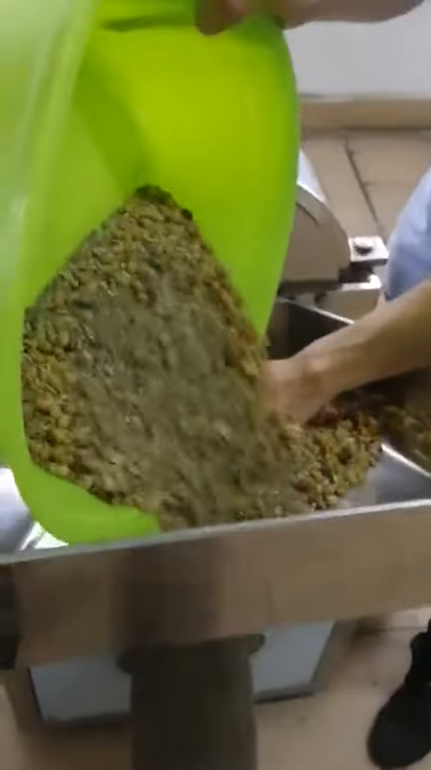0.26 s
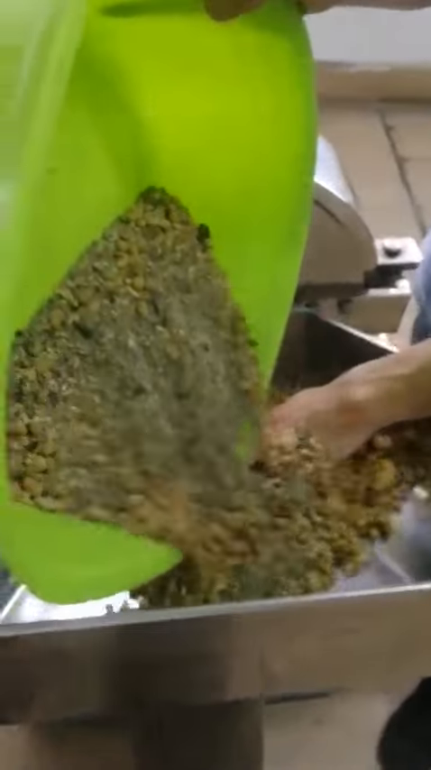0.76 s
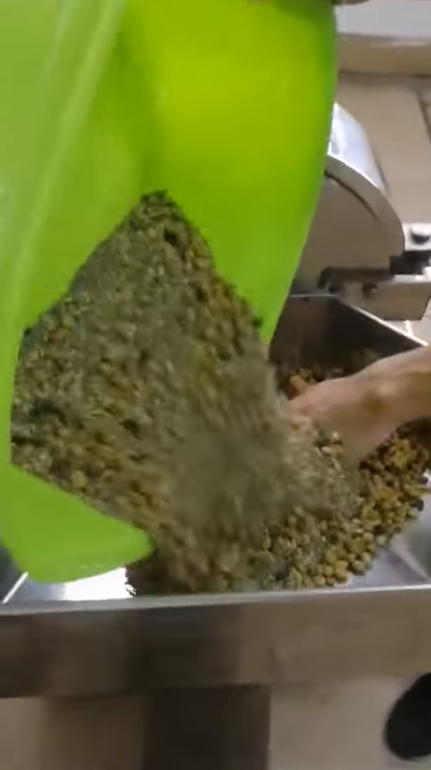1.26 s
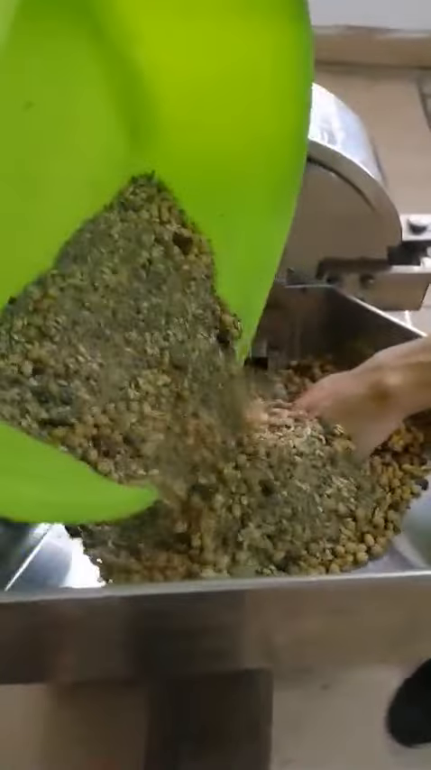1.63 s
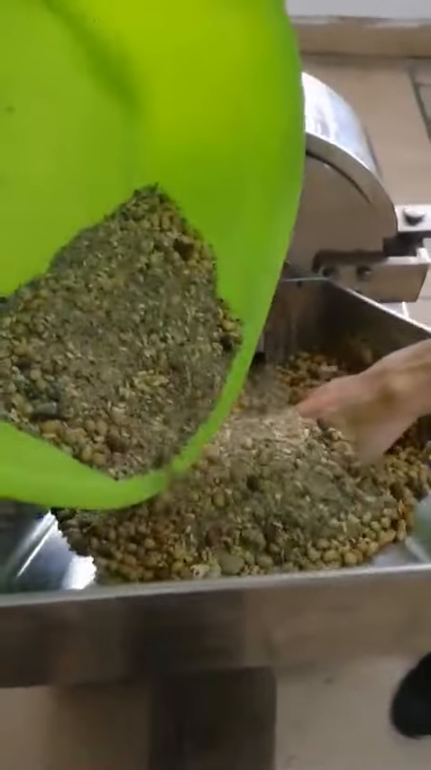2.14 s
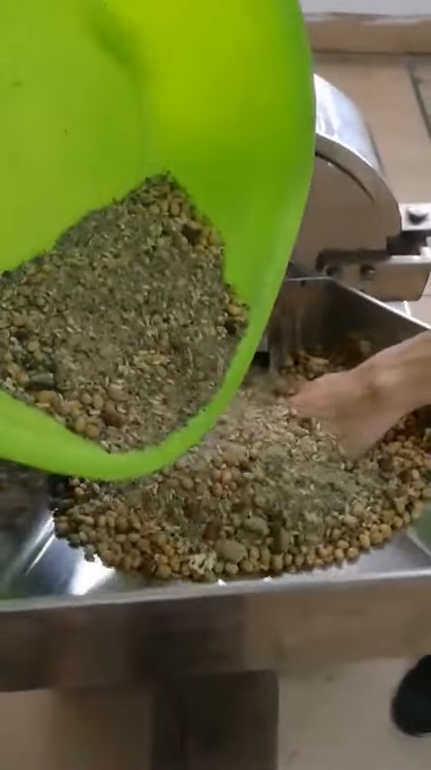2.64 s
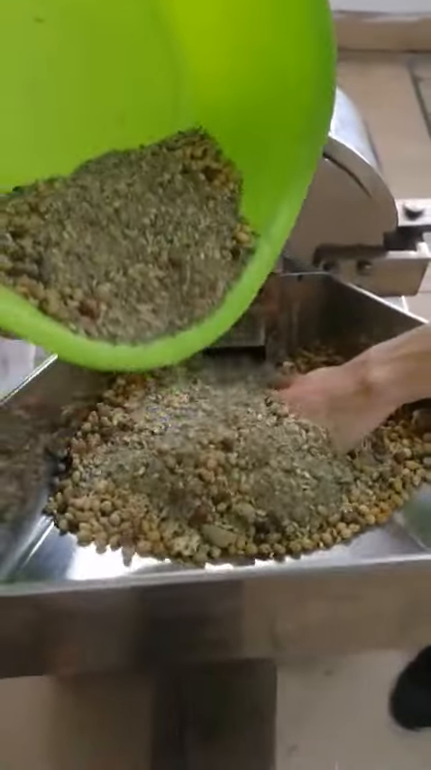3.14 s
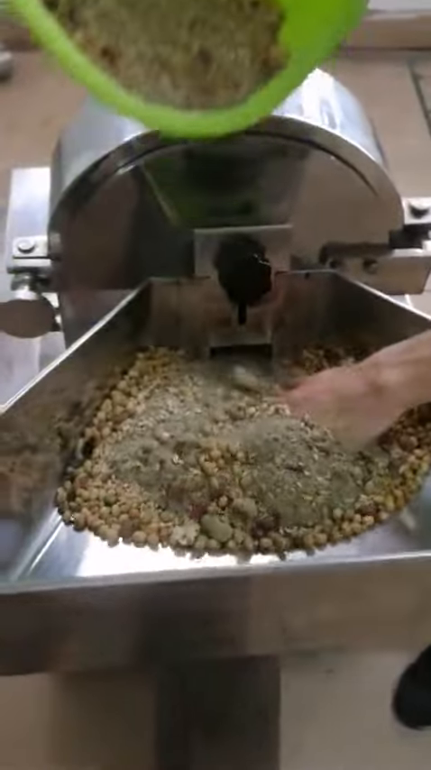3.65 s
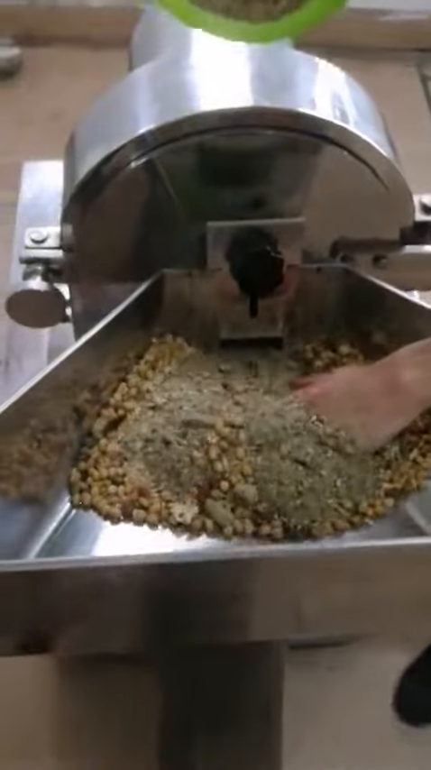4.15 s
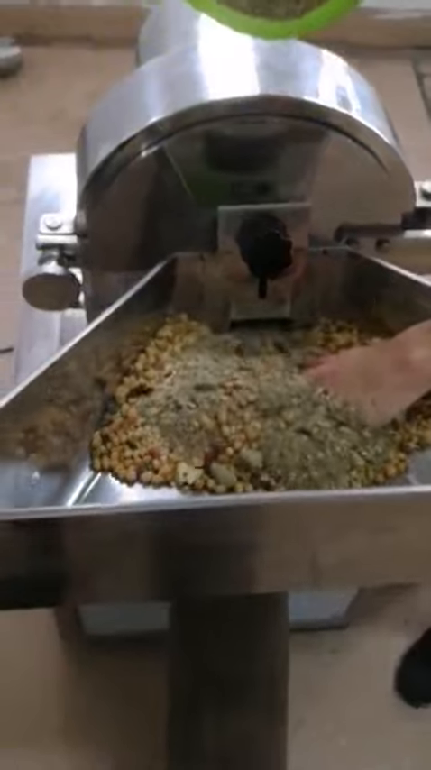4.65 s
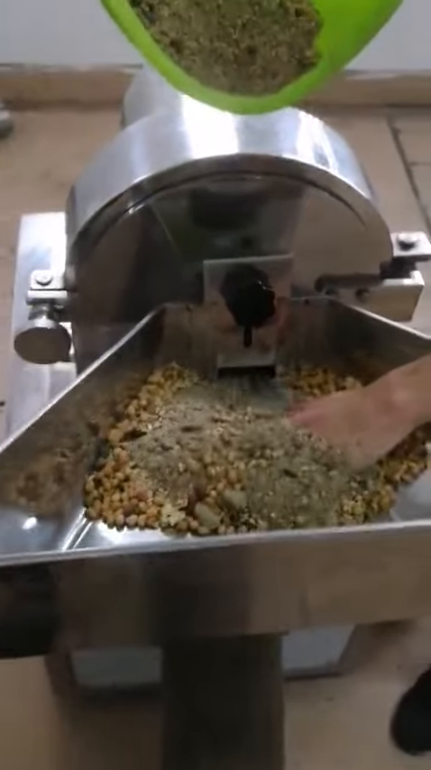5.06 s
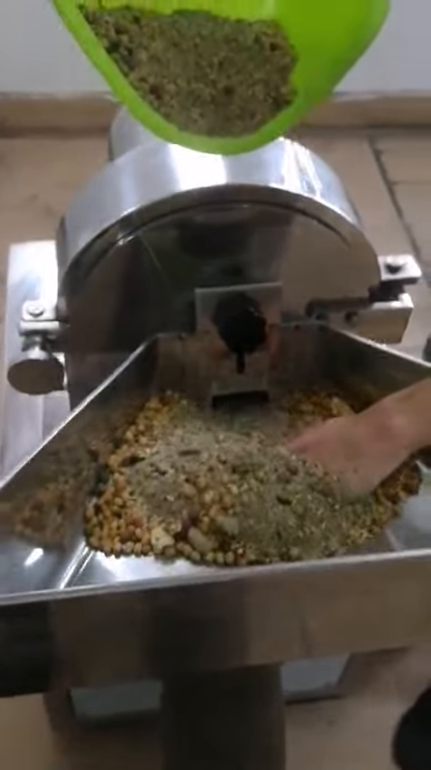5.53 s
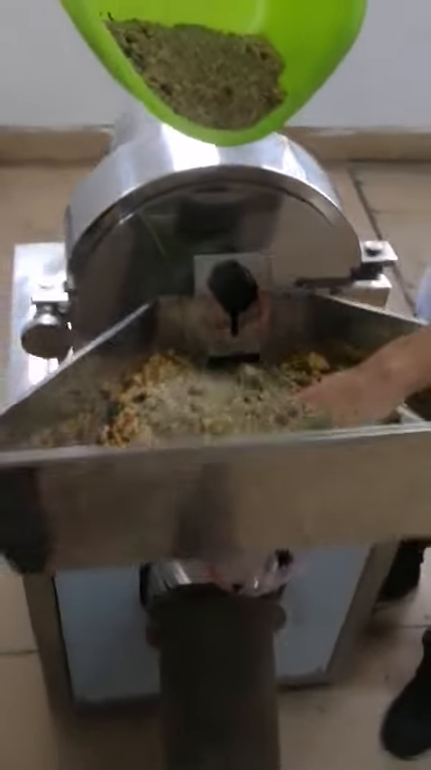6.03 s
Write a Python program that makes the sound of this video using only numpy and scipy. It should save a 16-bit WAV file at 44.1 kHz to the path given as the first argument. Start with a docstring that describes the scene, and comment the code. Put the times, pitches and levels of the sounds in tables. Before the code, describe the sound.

A small electric mill is already running: low steady hum, fluttering whine and a frame shudder throbbing about five times a second. Grain bursts in its steel chamber as a dense, bright hiss with snaps and metallic ticks. Poured grain rustles and drums dully on the hopper at first, then fades. The machine sags slightly near two seconds and grinds on. Close hand-held microphone in a hard, reflective workshop.

```python
"""A belt-driven grain mill hums, whines and shudders from the start, its tones locked to a four-armed rotor.
Kernels burst in its steel chamber as a dense, bright hiss of random ticks, with snaps and ricochets on top.
Grain pours from a bowl in a thin stream with larger slides; its drumming on the hopper soon fades under the heap.
Near two seconds the rotor sags under load and its whine flutters more; near three the bowl is raised.
Throughout, a hand-held microphone drifts through the standing waves of a hard-walled workshop."""
import sys
import numpy as np
from scipy import signal
from scipy.fft import rfft, irfft, next_fast_len
from scipy.io import wavfile
from scipy.ndimage import uniform_filter1d, map_coordinates

SR = 44100
rng = np.random.default_rng(int(sys.argv[2]) if len(sys.argv) > 2 else 0)


def transcribe(signal):
    """Save signal, clipped to [-1, 1], as a 16-bit WAV file at the path in sys.argv[1]."""
    frames = np.atleast_2d(signal).T
    limited = np.clip(frames, -1, 1)
    pcm = np.round(limited * 32767).astype(np.int16)
    wavfile.write(sys.argv[1], SR, pcm)


N = 277389  # length in samples

# In all tables pan_db is left minus right, and lead_rad is the phase by which the left port leads.
# Colours give density_db, a relative level per Hz: each coloured sound is levelled afterwards.

# balance of the two microphone ports: pitch_hz, pan_db
PORT_BALANCE = [(200, -0.5), (300, -11.5), (550, -1.5), (800, 0.5), (2000, 1.5), (6400, 1), (7500, 6),
                (9000, 10.5), (10600, -1.5), (12000, -5), (13000, -15), (15000, -7)]
# likeness of diffuse sound at the two ports: pitch_hz, correlation (-1 to 1)
PORT_LIKENESS = [(100, 0.9), (210, 1), (300, -0.032), (430, 0.16), (630, -0.59), (800, -0.45), (1100, 0.38),
                 (1450, -0.015), (1900, -0.022), (2500, -0.028), (4000, 0.083), (10000, 0.06)]
TOP_HZ = 15550  # band limit of the output

# rotor speed, which sags once the poured grain reaches the arms: start_s, speed_turns_per_s
ROTOR_SPEED = [(0, 77.27), (0.6, 77.47), (1.5, 77.26), (2.05, 76.72), (2.6, 76.78), (3.4, 76.95),
               (4.8, 76.86), (5.3, 76.96), (6.29, 77.03)]
ARMS = 4
# hum of the passing arms: start_s, level_db (before HUM_GAIN_DB), pan_db
HUM_LEVELS = [(0.05, -24.5, 2.5), (1.44, -21.5, 2), (1.83, -19, 1.5), (2.53, -19.5, 1.5),
              (4.13, -18.5, 1.5), (5.05, -22.5, 2), (5.39, -20, 2), (6.06, -24.5, 5), (6.2, -26, 17)]
HUM_GAIN_DB, HUM_LEAD_RAD = 1.5, -0.94

# overtones of the arms, pushed from port to port by the room's standing waves as the microphone moves:
# start_s, left_db, right_db (both before WHINE_GAIN_DB)
THIRD_OVERTONE = [(0.0, -40, -62), (0.37, -28, -34), (1.65, -26.5, -35), (2.0, -33, -35.5),
                  (2.47, -39, -33), (2.92, -32, -35), (3.07, -41.5, -36), (3.52, -26.5, -34),
                  (4.94, -27.5, -39), (6.29, -29, -42)]
FOURTH_OVERTONE = [(0.0, -42.5, -31.5), (0.52, -33.0, -34), (0.97, -40, -35), (1.27, -35.5, -38),
                   (2.39, -33.5, -31.5), (3.52, -31, -34), (5.24, -34.5, -28), (6.06, -29, -37),
                   (6.29, -36, -41)]
FIFTH_OVERTONE = [(0.0, -22.5, -29), (0.4, -26, -26.5), (1.4, -31, -34), (1.78, -30, -38), (1.9, -48, -32),
                  (2.25, -46, -35), (2.45, -49, -25), (2.84, -29, -41), (2.99, -40, -31.5),
                  (3.37, -33, -37), (3.59, -30.5, -38), (4.12, -26.5, -45), (4.27, -41, -28),
                  (5.46, -28, -36), (6.29, -26, -49)]
SIXTH_OVERTONE = [(0.0, -52, -27.5), (0.45, -30, -36), (0.97, -26, -52), (1.45, -29, -49),
                  (1.82, -40, -28.5), (1.95, -40, -40), (2.45, -33.5, -35), (2.95, -37, -37),
                  (3.14, -54.0, -31.5), (3.9, -54, -30), (4.19, -54, -34), (5.24, -53, -35),
                  (5.62, -46, -31), (5.84, -40, -51), (6.29, -44, -45)]
SEVENTH_OVERTONE = [(0.0, -44, -45), (0.8, -46, -60), (1.42, -40, -56), (1.8, -37.5, -42),
                    (2.6, -41.5, -43), (3.14, -38, -50), (3.4, -44, -47), (3.75, -42, -40),
                    (4.0, -35.5, -44), (4.56, -37, -52), (5.65, -43, -40), (6.29, -43, -43)]
WHINE_GAIN_DB = 0.4
# phase between the ports as the microphone crosses a node: start_s, sixth_lead_rad, seventh_lead_rad
NODE_PHASES = [(0, -1.3, 1.5), (1.5, -1.7, 1.7), (2.3, -0.9, 2.9), (2.7, -3, 2), (2.95, -3.5, 2.4),
               (3.2, -1.8, 1.3), (6.29, -2, 2.1)]

# weaker tones of the shaft: multiple_of_speed, level_db (at mid-scene),
# drift_db_per_s (as the microphone moves), pan_db, lead_rad
SHAFT_TONES = [(1, -37.5, -0.5, -0.5, 0.2), (5, -39, -1, -27, 1), (6, -35, 0.5, 9, 1.17),
               (8, -35.5, -1, 2, -2.5), (32, -44.5, -0.1, 2, 4)]
# shaking of the frame at twice the rotor speed: start_s, rotor_level_db, motor_share (of the rotor's part)
FRAME_SHUDDER = [(0.05, -28, 0.33), (.21, -26, .2), (.38, -28, 0.8), (.6, -30, 0.73), (.88, -23, 0.7),
                 (1.08, -32.5, .9), (1.3, -25, 0.72), (1.6, -29.5, 0.66), (1.85, -24.5, 0.39),
                 (2.1, -26, 0.45), (2.27, -22.5, .25), (2.48, -24.5, .5), (2.68, -22.3, 0.31),
                 (3.0, -22.3, .6), (3.31, -23.5, 0.67), (3.73, -24.5, 0.43), (4.15, -24.5, 0.16),
                 (4.45, -24.5, 0.29), (4.69, -24, 0.66), (5.13, -22.5, 0.34), (5.37, -24, 0.74),
                 (5.7, -23, .5), (5.85, -27, 0.45), (6.0, -25.5, .15), (6.29, -25, .25)]
# the motor falls behind the rotor as the belt slips: start_s, beats_count (each whole number is a lull)
BELT_BEATS = [(.05, 0), (.385, 2), (.59, 3), (.78, 4), (1.2, 6), (1.44, 7), (1.9, 9), (2.09, 10), (2.5, 12),
              (3.08, 15), (3.53, 17), (4.1, 20), (4.69, 23), (4.93, 24), (5.14, 25), (5.39, 26), (5.58, 27),
              (5.81, 28), (6.29, 31)]
# drone at three times the rotor speed: start_s, level_db (before its pulsing)
DRONE_LEVELS = [(0, -33), (.3, -29.5), (1.1, -33), (2.4, -31), (3.1, -34), (4.7, -37), (5.7, -38),
                (6.2, -35)]
# tones of motor, belt and bearings: pitch_hz (at the mean rotor speed), level_db
DRIVE_TONES = [(53.7, -42), (104.7, -44), (107.2, -45), (119.5, -44), (134.4, -45), (136.7, -37),
               (164.4, -43.5), (166.5, -40), (179, -43), (253.5, -44.5), (286, -43.5), (291, -42),
               (429, -50), (476, -43.5), (597, -49.5), (1375, -42.5)]

# colour of the air churned by the rotor: pitch_hz, density_db
AIR_RUSH = [(20, -26), (45, -17), (100, -8), (150, -3), (195, -8), (290, 2), (380, -4), (480, -2),
            (700, -6), (1000, -10), (1500, -7), (2000, -18.5), (2850, -27), (4000, -39.5), (6000, -19.5),
            (9000, -29.5)]
AIR_DB = -25

# how hard the grain is being ground: start_s, level_db
GRIND_LEVELS = [(0, -24), (.2, -25), (.37, -28), (.47, -27), (.65, -24), (.72, -27.5), (.88, -25.5),
                (.97, -28.5), (1.17, -21.5), (1.3, -23.3), (1.5, -23), (1.65, -20), (1.9, -22),
                (2.1, -21.5), (2.48, -20.7), (2.6, -24), (2.95, -22.5), (3.27, -22), (3.45, -22),
                (3.7, -23.5), (4.05, -21.5), (4.44, -21), (4.58, -22), (4.78, -19.5), (5.0, -19.5),
                (5.25, -23), (5.45, -22), (5.8, -22.3), (6.29, -23.5)]
# colour of shattering grain: pitch_hz, density_db
GRIT_COLOUR = [(1500, -20), (3000, -14), (3900, -19.5), (4500, -12), (5400, -12.5), (6100, -14),
               (7200, -5.5), (7600, -7.5), (8200, -4), (9200, -3.6), (10500, -13.5), (11100, -15),
               (11550, -17), (12400, -12), (13100, -18.5), (14200, -15), (15000, -22.5)]
# ringing modes of the steel chamber, relative to the grit, before their power is doubled:
# pitch_hz, width_hz, early_pour_db, late_pour_db, bowl_raised_db
STEEL_MODES = [(2710, 43, 6, 3, 4.5), (3670, 39, 6, 8, 3), (5240, 140, -14, -2, -1), (6480, 104, 0, 4, 3.5),
               (7000, 70, 1, -11, -8), (7440, 75, -4, -1, 0.5), (7930, 220, 2.5, -6.5, 2.5),
               (8670, 120, 4, -23, -2), (8830, 38, -5, -0.5, -1), (9380, 91, 0, -16, -4.5),
               (11200, 130, -8, -15, 3), (12000, 130, 5, 5, -12), (12300, 220, 3, -3, -3),
               (13520, 120, 3, 0, 6), (14020, 80, -8, 0, -3)]
# when each of those three colours is fully reached: start_s
STAGE_TIMES = [0.45, 2.32, 4.5]

# colour of coarse grain crushed between the arms and the casing: pitch_hz, density_db
CRUNCH_COLOUR = [(1200, -15), (2000, 0), (2900, 1), (3900, -3.5), (5000, -2.5), (6500, -7), (9000, -17)]
CRUNCH_DB, CRUNCH_FOLLOWS_FEED = -35, 0.19  # level at the average feed; dB per dB of feed

# whole kernels that ricochet off the steel; the level is relative to the feed
RICOCHETS_PER_S, RICOCHET_DB, RICOCHET_SPREAD_DB = 130, -12, 3.5
RICOCHET_HZ, RICOCHET_SPREAD_OCTAVES, RICOCHET_T60_S = 7700, 0.2, 0.016

# colour of falling grain drumming on the steel hopper: pitch_hz, density_db
HOPPER_COLOUR = [(250, -40), (400, -2), (560, 6), (720, 0), (1100, -9), (2300, -19.5), (4000, -40)]
HOPPER_DB, HOPPER_COVERED_S, HOPPER_FADE_DB_PER_S = -32, 0.86, 7

# colour of dry grain sliding onto the heap: pitch_hz, density_db
RUSTLE_COLOUR = [(2000, -6), (5000, -53), (8000, -5), (10000, 4), (12000, 2), (14000, 3), (15500, -19)]
# thin stream between the slides, until the bowl is raised
STREAM_DB, STREAM_END_S, STREAM_FADE_DB_PER_S = -41, 2.85, 75
# clumps that slide out of the bowl: peak_s, level_db
BOWL_SLIDES = [(.25, -28.5), (.52, -37), (1.08, -36), (1.38, -30)]
SLIDE_RISE_DB_PER_S, SLIDE_FALL_DB_PER_S = 83, 82

# hard kernels that crack: start_s, level_db (before CRACK_GAIN_DB)
HARD_KERNELS = [(.195, -9.5), (.249, -10.5), (.432, -14), (0.446, -8), (.521, -11.5), (.576, -9.5),
                (.631, -14.5), (.649, -15), (.84, -11), (.868, -13), (1.047, -6), (1.174, -10),
                (1.191, -6.5), (1.22, -7.5), (1.612, -6.5), (1.806, -6), (1.986, -11), (2.076, -6),
                (2.098, -6.5), (3.772, -10), (3.884, -6), (4.122, -6), (4.189, -13), (4.236, -6),
                (4.346, -9), (4.667, -11), (4.793, -8.5), (4.849, -9), (5.007, -17), (5.271, -24),
                (5.295, -11.5), (5.413, -12), (5.544, -13), (5.629, -19), (5.762, -7.5), (6.041, -6.5),
                (6.142, -14), (6.225, -9)]
CRACK_GAIN_DB = -9.0


def amp(db):
    """Decibels to gain."""
    return 10 ** (np.asarray(db) / 20)


def unit(x):
    """Bring x to rms 1."""
    return x / np.sqrt(np.mean(x ** 2) + 1e-20)


def along(points, hz):
    """Join (Hz, value) points on a log frequency axis."""
    f, v = np.transpose(points)
    return np.interp(np.log(hz + 1), np.log(f + 1), v)


def curves(rows):
    """Draw one automation curve, a value per sample, for each column after the time."""
    s, *columns = np.transpose(rows)
    return [np.interp(np.arange(N) / SR, s, column) for column in columns]


def wobble(rate):
    """A smooth random curve with rate knots a second."""
    steps = np.arange(0, N, 64)  # a coarse grid is smooth enough
    knots = rng.standard_normal(int(N * rate / SR) + 4)
    return np.interp(np.arange(N), steps, map_coordinates(knots, [steps * rate / SR]))


def filtered(x, response):
    """Filter x by a gain that depends on frequency."""
    m = next_fast_len(N + SR // 2)
    spectrum = rfft(x, m)
    return irfft(spectrum * response(np.fft.rfftfreq(m, 1 / SR)), m)[..., :N]


def sides(pan_db):
    """Left and right gains that keep the power."""
    gains = amp(np.array([[.5], [-.5]]) * pan_db)
    return gains / np.sqrt(np.mean(gains ** 2, axis=0))


def diffuse(pair, colour):
    """Two unrelated signals become one coloured, diffuse stereo sound of rms 1."""
    def mid_side_gains(hz):
        turn = np.arccos(np.clip(along(PORT_LIKENESS, hz), -1, 1)) / 2
        return colour(hz) * np.array([np.cos(turn), np.sin(turn)])

    mid, side = filtered(pair, mid_side_gains)
    left_right = np.array([mid + side, mid - side])
    return unit(filtered(left_right, lambda hz: sides(along(PORT_BALANCE, hz))))


def tone(angle, pan_db, lead, flutter, flutter_rate):
    """A stereo tone, rms 1 before panning, whose strength and phase flutter with the turbulence."""
    unsteady = 1 + flutter * (wobble(flutter_rate) + 1j * wobble(flutter_rate))
    note = unsteady * np.exp(1j * (angle + rng.uniform(0, 2 * np.pi)))
    port_phase = np.exp(1j * np.array([[.5], [-.5]]) * lead)
    return sides(pan_db) * unit(np.real(note * port_phase))


def spray(blows, t60):
    """The power of each blow dies away by 60 dB in t60 seconds as its fragments scatter."""
    t = np.arange(SR // 4) / SR
    return signal.fftconvolve(blows, amp(-60 * t / t60) ** 2)[:N]


def patter(blows_per_s, size_db, t60):
    """Power, of mean 1, of blows at random times and in random sizes."""
    sizes = amp(size_db * np.clip(rng.standard_normal(N), -2, 2)) ** 2
    blows = (rng.random(N) < blows_per_s / SR) * sizes
    bursts = spray(blows, t60)
    return bursts / np.mean(bursts)


def shatter(power, colour, fragments_per_s):
    """Tiny fragments tick so densely that they merge into a sizzle of the given power."""
    hits = rng.random((2, N)) < fragments_per_s / SR
    ticks = hits * rng.standard_normal((2, N))
    return diffuse(ticks * np.sqrt(np.abs(power)), colour) * np.sqrt(np.mean(np.abs(power)))


def patchy(x, depth_db, width_hz, life_s):
    """Patches of the spectrum swell and fade on their own; the result has rms 1."""
    hz, s, z = signal.stft(x, SR, nperseg=1024)
    field = rng.standard_normal(z.shape[1:])
    field = uniform_filter1d(field, size=max(1, round(width_hz / hz[1])), axis=0)
    field = uniform_filter1d(field, size=max(1, round(life_s / s[1])), axis=1)
    _, patched = signal.istft(z * amp(depth_db * unit(field)), nperseg=1024)
    return unit(patched[:, :N])


def hum(angle):
    """The arms pass four times a turn and make a strong, low note."""
    level_db, pan_db = curves(HUM_LEVELS)
    note = tone(ARMS * angle, pan_db, HUM_LEAD_RAD, flutter=0.04, flutter_rate=33)
    return amp(level_db + HUM_GAIN_DB) * note


def overtone(angle, levels, order, lead):
    """A multiple of the arm rate with a level for each port; it flutters more once grain loads the rotor."""
    flutter = np.interp(np.arange(N) / SR, [1.5, 2.0], [0.09, 0.27])
    note = tone(order * ARMS * angle, 0, lead + 0.2 * wobble(2.22), flutter=flutter, flutter_rate=20)
    return amp(WHINE_GAIN_DB + np.array(curves(levels)) + 0.64 * wobble(9.6)) * note


def whine(angle):
    """Five overtones of the arms make the whine."""
    sixth_lead, seventh_lead = curves(NODE_PHASES)
    return (overtone(angle, THIRD_OVERTONE, order=3, lead=-1.36)
            + overtone(angle, FOURTH_OVERTONE, order=4, lead=0)
            + overtone(angle, FIFTH_OVERTONE, order=5, lead=-0.21)
            + overtone(angle, SIXTH_OVERTONE, order=6, lead=sixth_lead)
            + overtone(angle, SEVENTH_OVERTONE, order=7, lead=seventh_lead))


def rotor(angle):
    """The weaker tones turn at whole multiples of the shaft speed."""
    from_middle_s = (np.arange(N) - N / 2) / SR
    total = 0
    for order, level_db, drift_db, pan_db, lead in SHAFT_TONES:
        note = tone(round(order) * angle, pan_db, lead, flutter=0.1, flutter_rate=12)
        total = total + amp(level_db + drift_db * from_middle_s) * note
    return total


def shudder(angle):
    """Rotor and motor shake the frame in and out of step, so it throbs about five times a second."""
    rotor_db, motor_share = curves(FRAME_SHUDDER)
    beats, = curves(BELT_BEATS)
    throb = 1 - motor_share * np.exp(-2j * np.pi * beats)  # rotor minus the lagging motor
    note = tone(2 * angle + np.angle(throb), 0, 0.33, flutter=0.051, flutter_rate=5.6)
    return amp(rotor_db) * np.abs(throb) * note


def drone(angle):
    """A tone at three times the rotor speed swells a little in each lull of the shudder."""
    level_db, = curves(DRONE_LEVELS)
    beats, = curves(BELT_BEATS)
    note = tone(3 * angle, -1, -1.5, flutter=0.1, flutter_rate=12)
    return amp(level_db + 1.5 * np.cos(2 * np.pi * beats)) * note


def drive(angle, speed):
    """Faint tones of motor, belt and bearings follow the rotor's changes of speed."""
    clock = angle / np.mean(speed)
    return sum(amp(level_db) * tone(hz * clock, 0, 0.075, flutter=0.49, flutter_rate=2.86)
               for hz, level_db in DRIVE_TONES)


def air(angle, chop):
    """Air rushes through the chamber, its upper part chopped by each passing arm."""
    rush = diffuse(rng.standard_normal((2, N)), lambda hz: amp(along(AIR_RUSH, hz)))
    upper = filtered(rush, lambda hz: hz ** 4 / (hz ** 4 + 700 ** 4))  # high-pass at 700 Hz
    chopped = rush + chop * np.cos(ARMS * angle) * upper
    return amp(AIR_DB + 1.2 * wobble(8.6)) * unit(chopped)


def chamber(hz, stage, ripple_db=4.3, spacing=40):
    """Breaking grain excites the steel's strong modes and a random ripple of countless weak ones."""
    ring = sum(amp(db[stage]) ** 2 / (1 + (2 * (hz - centre) / width) ** 2)
               for centre, width, *db in STEEL_MODES)
    ripple = map_coordinates(rng.standard_normal(size=2048), [hz / spacing], order=1)
    return amp(along(GRIT_COLOUR, hz) + ripple_db * ripple) * np.sqrt(1 + 2 * ring)


def in_chamber(power, fragments_per_s):
    """The ring of the chamber shifts colour as the bowl and the heap cover and uncover the inlet."""
    t = np.arange(N) / SR
    total = 0
    for stage, peak in enumerate(np.eye(len(STAGE_TIMES))):
        share = np.interp(t, STAGE_TIMES, peak)  # crossfade between stages
        total = total + shatter(power * share, lambda hz: chamber(hz, stage), fragments_per_s)
    return total


def grinding(dust_share):
    """Kernels burst at random over a sandy stream of meal and strike parts of the steel, whose ring drifts."""
    feed_db, = curves(GRIND_LEVELS)
    dust = np.clip(dust_share, 0, 1)
    bursts = dust + (1 - dust) * patter(blows_per_s=190, size_db=2.5, t60=0.14)
    power = amp(feed_db + 0.68 * wobble(9.4)) ** 2 * bursts + cracks()
    fragments = in_chamber(power, fragments_per_s=20000)
    sizzle = patchy(fragments, depth_db=1.5, width_hz=790, life_s=0.025)
    drifting = patchy(sizzle, depth_db=1.4, width_hz=50, life_s=0.4)
    return np.sqrt(np.mean(power)) * drifting


def crunch():
    """Coarse pieces crush in quick, gritty snaps below the sizzle, in a restless colour."""
    feed_db, = curves(GRIND_LEVELS)
    snaps = patter(blows_per_s=300, size_db=3, t60=0.07)
    grit = shatter(snaps, lambda hz: amp(along(CRUNCH_COLOUR, hz)), fragments_per_s=12000)
    uneven = patchy(grit, depth_db=4, width_hz=350, life_s=0.035)
    return amp(CRUNCH_DB + CRUNCH_FOLLOWS_FEED * (feed_db - feed_db.mean())) * uneven


def ricochets(count=4):
    """Whole kernels bounce off the steel; each tick rings a few short modes of its own."""
    feed_db, = curves(GRIND_LEVELS)
    t = np.arange(round(RICOCHET_T60_S * SR)) / SR
    starts = np.flatnonzero(rng.random(N) < RICOCHETS_PER_S / SR)
    ticks = np.zeros((2, N + len(t)))
    for start in starts:
        hz = RICOCHET_HZ * 2 ** (RICOCHET_SPREAD_OCTAVES * rng.standard_normal((count, 1)))
        size = amp(RICOCHET_SPREAD_DB * np.clip(rng.standard_normal(), -2, 2))
        modes = np.sin(2 * np.pi * hz * t) * amp(-60 * t / RICOCHET_T60_S)
        mode_gains = rng.uniform(-1.08, 1, (2, count))  # left and right drawn apart
        ticks[:, start:start + len(t)] += size * mode_gains @ modes
    at_ports = filtered(ticks[:, :N], lambda hz: sides(along(PORT_BALANCE, hz)))
    return amp(feed_db + RICOCHET_DB) * unit(at_ports)


def hopper():
    """Clumps of grain drum dully on the hopper, ever more quietly once the growing heap covers it."""
    covered_s = np.maximum(np.arange(N) / SR - HOPPER_COVERED_S, 0)
    level_db = HOPPER_DB - HOPPER_FADE_DB_PER_S * covered_s
    clumps = patter(blows_per_s=150, size_db=1.5, t60=0.078)
    return amp(level_db) * shatter(clumps, lambda hz: amp(along(HOPPER_COLOUR, hz)), fragments_per_s=2700)


def pouring():
    """Grain runs from the bowl in a thin stream, with a few larger slides, and rustles onto the heap."""
    t = np.arange(N) / SR
    flow = amp(STREAM_DB - STREAM_FADE_DB_PER_S * np.maximum(t - STREAM_END_S, 0))
    for s, level_db in BOWL_SLIDES:
        below_peak_db = np.maximum(SLIDE_RISE_DB_PER_S * (s - t), SLIDE_FALL_DB_PER_S * (t - s))
        flow = np.hypot(flow, amp(level_db - below_peak_db))  # powers add
    clumps = patter(blows_per_s=300, size_db=4.5, t60=0.06)
    return flow * shatter(clumps, lambda hz: amp(along(RUSTLE_COLOUR, hz)), fragments_per_s=12000)


def cracks():
    """Power of the hard kernels that snap against the arms and scatter: a brief snap and a longer spray."""
    blows = np.zeros(N)
    for s, level_db in HARD_KERNELS:
        blows[round(s * SR)] = amp(level_db + CRACK_GAIN_DB) ** 2
    return spray(blows, t60=0.11) + 0.5 * spray(blows, t60=0.004)


def scene():
    """Mix the machine's tones, the air and the grain."""
    speed, = curves(ROTOR_SPEED)
    angle = 2 * np.pi * np.cumsum(speed) / SR  # of the shaft, in radians
    tones = hum(angle) + whine(angle) + rotor(angle) + shudder(angle) + drone(angle) + drive(angle, speed)
    grain = grinding(dust_share=0.57) + crunch() + ricochets() + hopper() + pouring()
    return tones + air(angle, chop=0.55) + grain


def record(dry):
    """A soft limiter rounds off the highest peaks, then a steep low-pass removes all above the band limit."""
    rounded = dry / (1 + np.abs(dry / .88) ** 8) ** (1 / 8)
    return filtered(rounded, lambda hz: hz < TOP_HZ)


dry = scene()
out = record(dry)
transcribe(out)
```